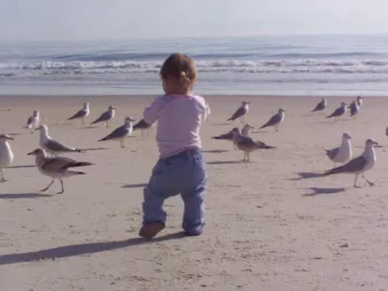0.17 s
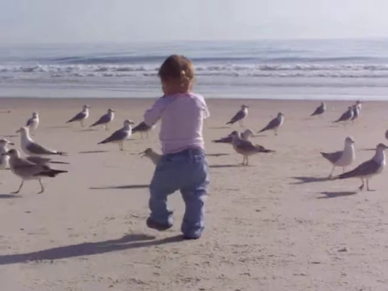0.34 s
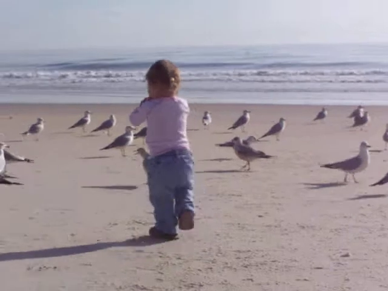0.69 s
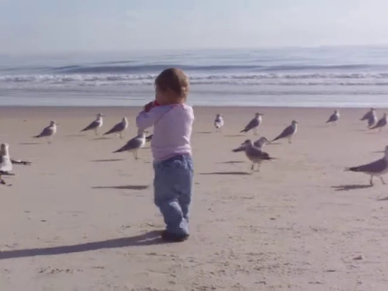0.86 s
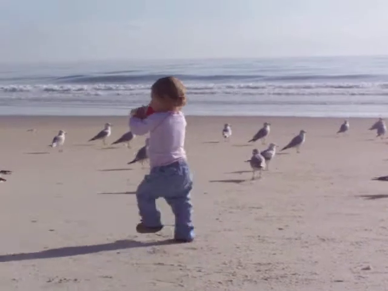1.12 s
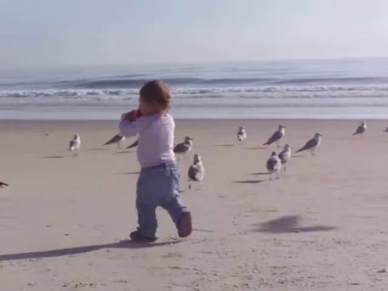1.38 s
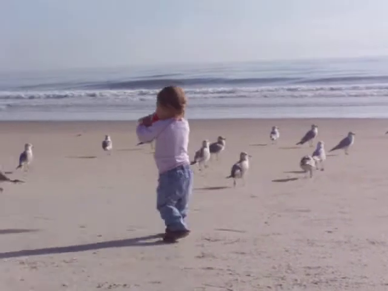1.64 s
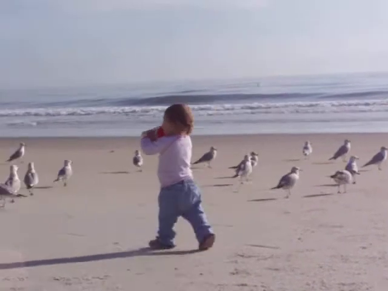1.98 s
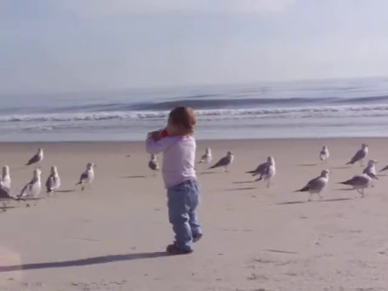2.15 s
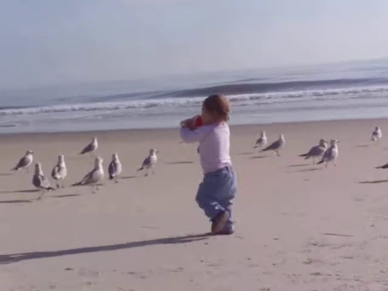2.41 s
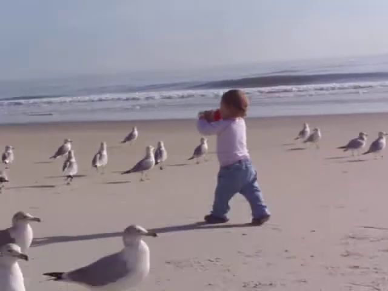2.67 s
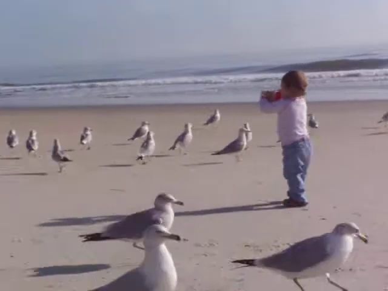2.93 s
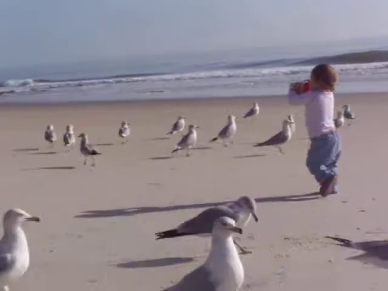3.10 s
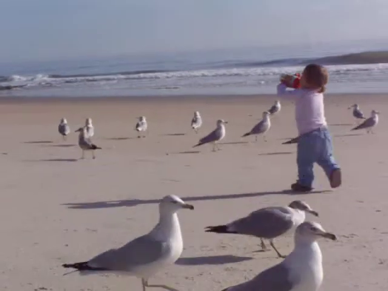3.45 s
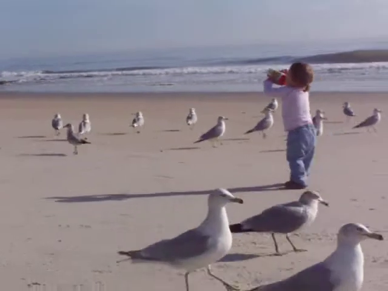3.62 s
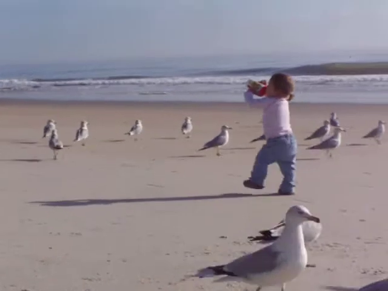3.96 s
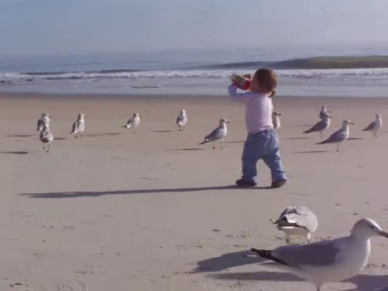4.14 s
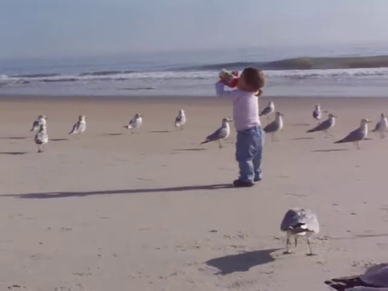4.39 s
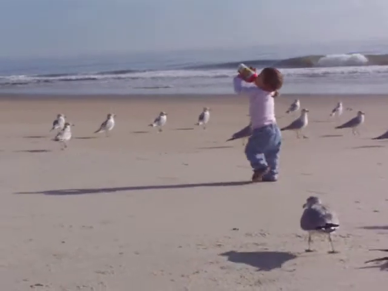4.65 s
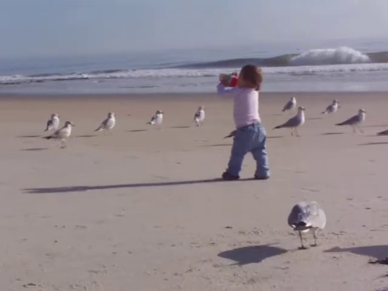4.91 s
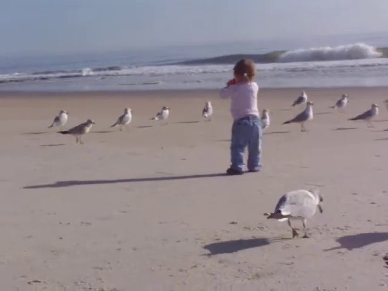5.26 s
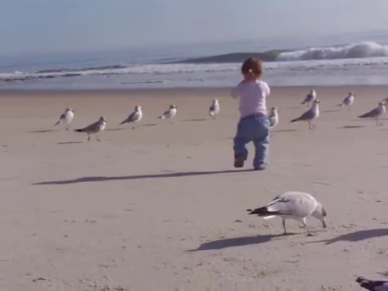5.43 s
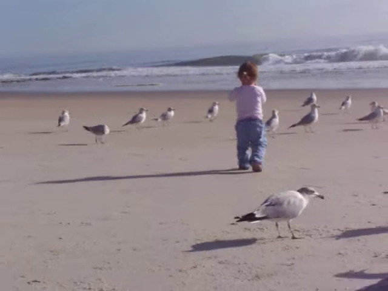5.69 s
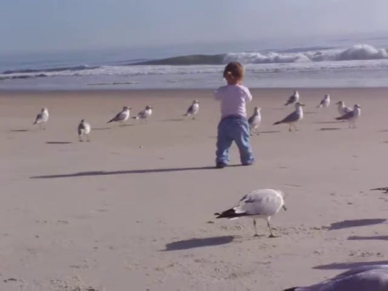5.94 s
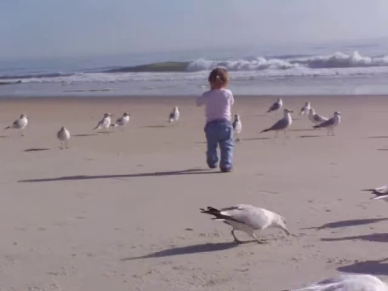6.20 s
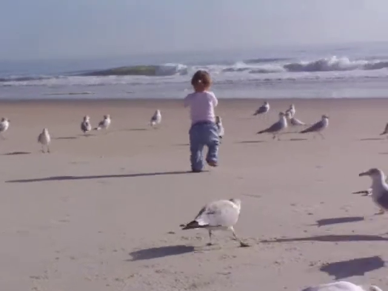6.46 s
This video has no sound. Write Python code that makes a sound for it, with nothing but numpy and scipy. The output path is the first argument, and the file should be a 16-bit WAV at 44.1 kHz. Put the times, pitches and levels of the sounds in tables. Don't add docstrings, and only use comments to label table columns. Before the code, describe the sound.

A large gull flock squeals, yelps and rasps in constant overlapping cries on an open beach, with low surf roaring and fizzing behind.

```python
import sys
import numpy as np
from scipy import signal
from scipy.fft import rfft, irfft, next_fast_len
from scipy.io import wavfile
from scipy.ndimage import uniform_filter1d

SR = 44100
rng = np.random.default_rng(int(sys.argv[2]) if len(sys.argv) > 2 else 0)


def waveform_to_disk(signal):
    frames = np.transpose(np.atleast_2d(signal))
    scaled = np.clip(frames, -1, 1) * 32767
    samples = np.round(scaled).astype(np.int16)
    wavfile.write(sys.argv[1], SR, samples)


def rack_gain(trim_db):
    fader = np.asarray(trim_db, float)
    return 10 ** (fader / 20)


N = 289737
T = np.arange(N) / SR
START_S, FOLD_HZ = 0.372, 8000
CLEAR_ROUGH, HOARSE_ROUGH = 0.1, 0.22
RASP_SPEED_UP, CROAK_SPEED_UP = 0.3, 0.091
HELD_ARCH = 0.026


def shape(x, points):
    hz, db = np.transpose(points)
    size = next_fast_len(len(x))
    f = np.maximum(np.arange(size // 2 + 1) * SR / size, 1)
    gain = rack_gain(np.interp(np.log(f), np.log(hz), db, -90, -90))
    return irfft(rfft(x, size) * gain, size)[:len(x)]


def unit(x):
    return x / np.sqrt(np.mean(x ** 2))


def walk(rate, size=N):
    hold = int(SR / rate)
    steps = np.repeat(rng.standard_normal(size // hold + 1), hold)
    return uniform_filter1d(uniform_filter1d(steps, hold), hold)[:size] * 4 / 3


def add(out, start_s, x):
    i = int(start_s * SR)
    out[i:i + len(x)] += x[:N - i]


# t/s, level/dB
SURF_ROAR = [(.38, -43.5), (.6, -36), (.75, -40.5), (.9, -32.5), (1.05, -38), (1.27, -35), (1.5, -41),
             (2.28, -26.5), (2.54, -37.5), (2.85, -47), (3.3, -45), (3.6, -32.5), (3.72, -49.5),
             (4.4, -45.5), (5.1, -38.5), (5.5, -29.5), (6.15, -43), (6.31, -36.5)]
# f/Hz, level/dB (per Hz)
ROAR_COLOUR = [(21, -44), (40, -7.5), (207, 1), (454, -2), (566, 0.5), (1500, -16.5), (1950, -54),
               (3300, -120)]
# f/Hz, level/dB (per Hz)
HISS_COLOUR = [(700, -15), (1500, -3), (3000, -2.5), (5000, 1.5), (6500, -4), (7500, -9), (8000, -11)]


def surf():
    roar_db = np.interp(T, *np.transpose(SURF_ROAR))
    roar = unit(shape(rng.standard_normal(N), ROAR_COLOUR)) * rack_gain(1.5 * walk(14))
    fizz = rng.standard_normal(N) * rack_gain(2 * walk(300) + 2 * walk(24))
    hiss = unit(shape(fizz, HISS_COLOUR))
    return rack_gain(roar_db) * roar + rack_gain(0.5 * roar_db - 18.0) * hiss


def whistle(rows, octave_db, edge_s=0.0025, waver=0.004, flutter_db=0.65, third_db=-12, flutter_rate=150):
    s, hz, db = np.transpose(rows)
    t = np.arange(s[0] - edge_s, s[-1] + edge_s, 1 / SR)
    hz = uniform_filter1d(np.interp(t, s, hz), size=500)
    hz = hz * (1 + waver * walk(120, size=len(t)))
    level_db = np.interp(t, s, db) + flutter_db * walk(flutter_rate, size=len(t))
    to_nearer_end = np.minimum(t - t[0], t[-1] - t)
    gain = rack_gain(level_db) * np.sqrt(2) * np.clip(to_nearer_end / (2 * edge_s), 0, 1)
    tone = np.sin(2 * np.pi * np.cumsum(hz) / SR)
    for order, over_db in ((2, octave_db), (3, octave_db + third_db)):
        folded = FOLD_HZ - np.abs(FOLD_HZ - order * hz)
        overtone = np.sin(2 * np.pi * np.cumsum(folded) / SR)
        tone = tone + rack_gain(over_db) * (order * hz < 8800) * overtone
    return gain * tone


def cry(s, length, first, last, db, rise_db=0, fall_db=0, bend=1, arch=0):
    u = np.linspace(0, 1, num=12)
    glide = first + (last - first) * u ** bend
    hz = glide * (1 - arch * (2 * u - 1) ** 6)
    return list(zip(s + length * u, hz, db - rise_db * (1 - u) - fall_db * u))


# f/Hz, level/dB
OCTAVE_BY_PITCH = [(1700, -49), (2850, -14), (3500, -20), (3900, -24), (4300, -40.5), (4900, -39.5)]


def pitch_octave(rows):
    return np.interp(np.mean(rows, axis=0)[1], *np.transpose(OCTAVE_BY_PITCH))


def sing(lines, octave_db=None, third_db=-12):
    out = np.zeros(N)
    for rows in lines:
        over_db = pitch_octave(rows) if octave_db is None else octave_db
        add(out, rows[0][0] - 0.003, whistle(rows, over_db, third_db=third_db))
    return out


# t/s, f/Hz, level/dB
REEDY_CALLS = [
    [(1.188, 3340, -40.5), (1.228, 3490, -36.5)],
    [(2.493, 4050, -34.5), (2.53, 4230, -38), (2.545, 4223, -43)],
    [(2.65, 4190, -34), (2.72, 4290, -40)],
    [(3.27, 3470, -42.5), (3.315, 3670, -31.5), (3.355, 3596, -40.5)],
    [(.374, 3230, -38), (.41, 3093, -31.5), (.5, 3185, -30), (.605, 3233, -31.5)],
    [(1.985, 2867, -23), (2.09, 2862, -20), (2.112, 2616, -31)],
    [(2.09, 3255, -24), (2.135, 3340, -20)],
    [(4.995, 2584, -24), (5.015, 3035, -27)],
    [(2.135, 4063, -22.5), (2.18, 4251, -24.5), (2.215, 3910, -25), (2.235, 3832, -22)],
]


def reedy_cries():
    return sing(REEDY_CALLS, octave_db=-6, third_db=-20)


def rasp(length_s, rate_hz, rough, db, throat_hz, speed_up, ring_s=0.00024):
    t = np.arange(0, length_s, 1 / SR)
    chance = rng.standard_normal((200, 2))
    cycle = np.cumsum(rate_hz * (1 + speed_up * t / max(length_s, 0.06))) / SR
    uneven_count = np.cumsum(1 + 0.2 * rough * chance[:, 0].clip(-2, 2)) - 2
    beats = np.interp(uneven_count, cycle, t, right=1)
    last = np.searchsorted(beats, t, side="right") - 1
    since = t - beats[last]
    hz = throat_hz * (0.9 + 3 * t.clip(0, 0.07))
    upper = np.sin(2 * np.pi * 1.108 * hz * since)
    lower = (1.1 - 0.5 * t / length_s) * np.sin(2 * np.pi * 0.7743 * hz * since)
    ring = (since / ring_s) ** 2 * np.exp(-since / ring_s)
    slaps = unit(ring * (upper + lower) * rack_gain(10 * rough * chance[last, 1]))
    throat = signal.butter(2, throat_hz * np.array([0.6, 1.4]), "band", fs=SR, output="sos")
    air = unit(signal.sosfilt(throat, rng.standard_normal(len(t))))
    swell = np.sin(np.pi * (t / length_s) ** 0.8) ** 0.8
    thin = signal.butter(3, 0.5 * throat_hz, "high", fs=SR, output="sos")
    return rack_gain(db) * swell * signal.sosfilt(thin, slaps + rough * air / 4)


def play_rasps(rows, rough, speed_up):
    out = np.zeros(N)
    for s, length, rate_hz, db, throat_hz in rows:
        add(out, s, rasp(length, rate_hz, rough, db, throat_hz, speed_up))
    return out


# t/s, length/s, pulse rate f/Hz, level/dB, throat f/Hz
EVEN_RASPS = [(.379, 0.0071, 333.9, -29, 5540), (1.96, .09, 108.7, -33.5, 2423), (4.41, .1, 423, -40, 3530),
              (2.96, .08, 347.9, -33, 4086), (.468, 0.024, 358.4, -25.5, 3560),
              (.896, 0.022, 322, -16.5, 4021), (1.25, .051, 331.7, -16, 4150),
              (1.68, 0.078, 402, -22, 3980), (2.65, .04, 258, -29.5, 5100),
              (3.301, 0.072, 312, -34.5, 2500), (3.798, 0.071, 313.5, -27.5, 4770),
              (4.262, 0.064, 358, -22, 4310), (4.501, 0.14, 402.7, -31, 3560),
              (4.711, 0.057, 305.3, -26, 3448), (4.996, 0.043, 821.3, -25, 4450),
              (6.299, 0.058, 314.4, -18.5, 4290), (6.349, 0.068, 523, -24, 4267)]


def clear_rasps():
    return play_rasps(EVEN_RASPS, CLEAR_ROUGH, RASP_SPEED_UP)


# t/s, length/s, pulse rate f/Hz, level/dB, throat f/Hz
BREATHY_RASPS = [(.42, .025, 407.1, -32.5, 4590), (2.04, 0.062, 378, -30.5, 6217),
                 (4.17, 0.034, 406, -36, 6615), (.6, 0.083, 357, -33, 5530),
                 (2.24, 0.099, 378.6, -25, 4450), (2.415, 0.02, 366, -25.5, 4059),
                 (2.825, 0.061, 330, -29, 3840), (4.765, 0.015, 393.3, -16.5, 4190),
                 (4.06, 0.036, 384.4, -27.5, 4340), (5.69, 0.023, 357.8, -33, 3040),
                 (2.044, 0.082, 384.1, -23, 3600), (2.436, .034, 395, -18, 4090),
                 (2.704, .04, 327, -22.5, 4510), (3.097, 0.11, 436, -26.5, 3800),
                 (3.61, .065, 330, -17.5, 4890), (3.63, .07, 410, -18, 4230),
                 (4.004, 0.018, 291, -25, 4614), (4.368, 0.028, 421, -16.5, 4880),
                 (4.595, .046, 387, -24, 4330), (4.93, 0.066, 459.8, -26, 5230),
                 (5.515, 0.042, 407, -20, 3680), (5.62, 0.056, 386.4, -21.5, 3900),
                 (6.106, 0.026, 409, -25.5, 3650)]


def hoarse_rasps():
    return play_rasps(BREATHY_RASPS, HOARSE_ROUGH, RASP_SPEED_UP)


# t/s, length/s, first f/Hz, last f/Hz, top level/dB
SWELLING_CALLS = [
    (0.481, .42, 3039, 2930, -25.5),
    (0.932, 0.054, 3325, 3393, -12),
    (1.668, 0.12, 3200, 3383, -18.5),
    (2.266, 0.068, 1659, 1800, -20),
    (2.568, 0.074, 4010, 4355, -20.5),
    (4.043, 0.028, 3310, 2900, -25),
    (4.884, 0.06, 3395, 3477, -17.5),
    (5.865, 0.16, 4670, 4690, -24),
    (5.94, 0.25, 4275, 4495, -25),
    (5.969, 0.14, 5000, 5076, -27),
]


def swelling_cries():
    return sing([cry(*c, rise_db=7, bend=1.7) for c in SWELLING_CALLS])


# t/s, length/s, first f/Hz, last f/Hz, level/dB
PLAIN_SQUEALS = [(0.514, 0.44, 7530, 7415, -52), (3.413, 0.16, 5604, 5364, -42),
                 (5.777, 0.15, 5623, 6030, -45.5), (2.429, 0.065, 4633, 5010, -24),
                 (2.511, 0.043, 4580, 4310, -19), (3.982, 0.018, 4394, 4080, -21),
                 (4.174, 0.087, 4690, 3921, -22.5), (4.637, .07, 3510, 3415, -27.5),
                 (5.158, 0.04, 3460, 3253, -18), (5.386, 0.036, 5370, 5440, -18.5),
                 (5.881, 0.087, 4214, 3700, -32)]


def plain_squeals():
    return sing([cry(*c) for c in PLAIN_SQUEALS], octave_db=-27.5)


# t/s, length/s, first f/Hz, last f/Hz, level/dB
SHORT_YELPS = [(0.516, 0.45, 1597, 1417, -50), (1.885, .016, 6750, 6100, -20),
               (2.317, 0.019, 5210, 5487, -13.5), (2.346, 0.078, 5250, 5645, -14.5),
               (2.441, .06, 1634, 1690, -31.5), (2.876, 0.064, 2382, 2080, -34),
               (4.518, 0.035, 6300, 6416, -29), (4.746, 0.024, 5670, 4000, -20),
               (5.025, 0.014, 4402, 4660, -18), (5.033, 0.017, 5600, 6842, -32.5),
               (5.178, .016, 4480, 4804, -22)]


def yelps():
    return sing([cry(*c) for c in SHORT_YELPS], octave_db=-27.5)


# t/s, length/s, first f/Hz, last f/Hz, level/dB
HELD_CALLS = [(0.517, .395, 4623, 4390, -26.5), (1.32, 0.215, 4363, 4430, -15),
              (1.782, 0.108, 4501, 4405, -16), (2.648, 0.4, 4557, 4496, -26.5),
              (3.292, .172, 4366, 4440, -30.5), (2.682, 0.064, 5001, 4955, -19),
              (3.891, 0.095, 5458, 5283, -21.5), (3.929, 0.11, 3290, 3326, -32),
              (4.868, 0.059, 5800, 5555, -19), (5.691, 0.059, 3615, 3660, -15),
              (6.379, 0.19, 3280, 3605, -30.5), (6.423, 0.15, 5034, 5130, -13.5)]


def held_cries():
    return sing([cry(*c, arch=HELD_ARCH) for c in HELD_CALLS])


# t/s, f/Hz, level/dB
CURVING_EARLY = [
    [(.683, 4713, -18.5), (.72, 4694, -28), (.77, 4780, -25.5), (.85, 5020, -23), (.912, 4840, -31.5)],
    [(.587, 3946, -16), (.65, 3764, -14.5), (.684, 3824, -17), (.69, 3618, -24.5), (.72, 3464, -32)],
    [(.745, 5834, -25), (.84, 5857, -25.5), (.86, 5840, -23.5), (.89, 5380, -38)],
    [(.985, 4220, -15), (1.12, 4306, -16), (1.14, 4016, -22)],
    [(1.055, 4910, -30), (1.12, 4880, -33), (1.14, 4596, -25.5)],
    [(1.5, 3130, -39.5), (1.53, 3306, -23), (1.56, 3010, -26.5)],
    [(1.543, 4660, -16.5), (1.58, 4732, -16), (1.65, 4367, -18), (1.72, 4420, -25), (1.8, 4237, -26.5),
     (1.85, 4130, -31)],
    [(2.465, 3454, -17), (2.51, 3078, -22), (2.55, 3033, -29)],
    [(2.478, 6660, -39.5), (2.51, 6218, -38), (2.55, 6170, -38.5), (2.61, 5110, -36)],
    [(2.535, 4330, -12.5), (2.6, 3510, -17), (2.63, 3307, -16.5), (2.65, 3420, -21.5)],
    [(2.722, 5600, -25.5), (2.736, 5780, -16.5), (2.756, 5340, -20), (2.825, 5328, -29)],
    [(2.755, 4960, -16), (2.79, 4604, -11.5), (2.817, 4560, -15), (2.825, 4760, -14)],
]
# t/s, f/Hz, level/dB
CURVING_LATER = [
    [(2.826, 5630, -25), (2.91, 5800, -16), (2.93, 6139, -15), (2.945, 5993, -21.5), (3.0, 6050, -41.5),
     (3.08, 6078, -33.5), (3.17, 5974, -32.5)],
    [(2.945, 5516, -14.5), (2.972, 5923, -20.5), (3.0, 5550, -17.5), (3.027, 6020, -27.5),
     (3.05, 5317, -16), (3.068, 5687, -33.5), (3.09, 6002, -22.5), (3.11, 5340, -15.5)],
    [(3.03, 4175, -33), (3.1, 4419, -20.5), (3.15, 4563, -19.5), (3.165, 4226, -30)],
    [(3.68, 4552, -16.5), (3.71, 4666, -19), (3.79, 4624, -20.5)],
    [(3.71, 3680, -34), (3.75, 3521, -32), (3.8, 3200, -31.5), (3.83, 3304, -28.5)],
    [(3.96, 6310, -30.5), (4.07, 6390, -32.5), (4.12, 6250, -26.5), (4.17, 5610, -29.5)],
    [(4.105, 5414, -40), (4.22, 5310, -40.5), (4.27, 4900, -32.5)],
    [(4.404, 5660, -19.5), (4.411, 4830, -14.5), (4.416, 5340, -21)],
    [(5.192, 5282, -15), (5.228, 5500, -12.5), (5.285, 5210, -13.5)],
    [(5.755, 3300, -25.5), (5.95, 3470, -36.5), (6.05, 3286, -46), (6.09, 3460, -20.5),
     (6.115, 3072, -23.5)],
    [(6.35, 4610, -9.5), (6.373, 5050, -19), (6.383, 4649, -25)],
    [(6.372, 3564, -18.5), (6.41, 3576, -15.5), (6.428, 3820, -17.5)],
]


def curving_cries():
    return sing(CURVING_EARLY + CURVING_LATER)


# t/s, length/s, first f/Hz, last f/Hz, level/dB
FAINT_SQUEALS = [(0.767, .1, 3524, 4000, -37), (0.981, 0.044, 2770, 2460, -35),
                 (1.23, 0.062, 4487, 4624, -29), (1.271, 0.023, 5810, 5690, -27.5),
                 (1.666, .09, 5400, 5450, -39.5), (1.888, 0.013, 3400, 3002, -28),
                 (2.127, 0.039, 4620, 4680, -23.5), (2.729, 0.02, 2865, 2734, -30.5),
                 (2.765, .03, 3790, 3468, -34), (3.116, 0.012, 1491, 1667, -35.5),
                 (3.27, .025, 1593, 1831, -32.5), (3.4, 0.2, 3800, 3735, -46.5),
                 (3.434, 0.15, 5010, 4760, -36.5), (3.456, 0.016, 2234, 2110, -40.5),
                 (3.48, 0.018, 1520, 1625, -37.5), (3.615, 0.028, 1495, 1867, -31),
                 (4.169, .06, 3186, 3236, -30), (4.645, 0.061, 5338, 5210, -30),
                 (4.644, .05, 4830, 4820, -32), (5.01, 0.016, 3370, 3711, -20.5),
                 (4.695, 0.026, 4150, 4150, -29.5), (4.432, 0.082, 5440, 5380, -31.5),
                 (3.298, 0.058, 2106, 2253, -41), (3.262, .1, 4925, 5105, -32),
                 (2.65, 0.05, 3203, 3200, -38), (5.206, 0.042, 3118, 3325, -34.5),
                 (5.21, 0.028, 4020, 3934, -36.5), (5.275, .045, 4710, 4610, -26.5),
                 (5.331, 0.025, 5400, 5250, -23), (5.453, 0.011, 6000, 5620, -28),
                 (5.462, 0.017, 3214, 2883, -31.5), (5.66, 0.016, 5935, 6090, -25),
                 (5.675, 0.12, 5440, 4930, -32.5), (5.877, 0.015, 5200, 5000, -28),
                 (6.184, 0.013, 3330, 2940, -30), (6.384, .035, 5380, 5400, -34)]


def faint_squeals():
    return sing([cry(*c) for c in FAINT_SQUEALS], octave_db=-27.5)


# t/s, length/s, pulse rate f/Hz, level/dB, throat f/Hz
REEDY_CROAKS = [
    (.909, 0.066, 669, -19.5, 3477),
    (5.527, 0.0463, 1142, -17.5, 3504),
]


def croaks():
    return play_rasps(REEDY_CROAKS, CLEAR_ROUGH, CROAK_SPEED_UP)


# t/s, length/s, first f/Hz, last f/Hz, level/dB
CRACKED_CALLS = [
    (1.023, 0.1, 3173, 3136, -34),
    (1.326, .17, 3120, 3193, -33),
    (1.798, 0.082, 3229, 3277, -38),
    (2.994, 0.11, 4580, 4618, -39),
    (3.331, 0.071, 4780, 4990, -35),
    (4.39, 0.15, 4760, 4790, -34),
    (4.529, 0.063, 2918, 3041, -39),
    (6.449, .12, 4598, 4610, -38.5),
]


def cracked_cries():
    out = np.zeros(N)
    for c in CRACKED_CALLS:
        add(out, c[0], whistle(cry(*c), -30, edge_s=0.008, waver=0.006, flutter_db=4, flutter_rate=500))
    return out


# t/s, length before the sag/s, first f/Hz, last f/Hz, top level/dB
DROOPING_CALLS = [
    (1.11, 0.18, 2619, 2894, -22.5),
    (1.585, 0.13, 2840, 2868, -23),
    (2.343, 0.12, 2620, 2924, -18.5),
    (2.949, 0.16, 2856, 3072, -26),
    (4.603, 0.13, 5650, 5814, -16),
]


def drooping_cries():
    out = np.zeros(N)
    sag_s, sag_share, sag_db = 0.035, 0.045, 15
    for s, length, first, last, db in DROOPING_CALLS:
        rows = cry(s, length, first, last, db, rise_db=7.5)
        rows = rows + [(s + length + sag_s, last * (1 - sag_share), db - sag_db)]
        out += sing([rows], octave_db=pitch_octave(rows) - 3)
    return out


# t/s, length/s, first f/Hz, last f/Hz, level/dB
SLIDING_CALLS = [
    (1.29, 0.042, 3125, 3264, -19),
    (4.087, 0.078, 3140, 3620, -31),
    (4.56, 0.042, 6488, 5787, -22.5),
    (4.625, .13, 7095, 6900, -33.5),
    (4.752, .075, 3263, 3423, -22),
    (4.938, .015, 3333, 3045, -14),
    (5.25, .086, 4621, 5015, -21),
    (5.656, .04, 3450, 3746, -16.5),
    (5.754, 0.11, 4370, 4670, -27.5),
]


def sliding_cries():
    return sing([cry(*c) for c in SLIDING_CALLS])


# t/s, length/s, first f/Hz, last f/Hz, level/dB
HUSKY_CALLS = [
    (1.533, 0.042, 3666, 3970, -20),
    (1.939, 0.049, 3712, 3950, -15.5),
    (3.168, .09, 3696, 3894, -31),
    (5.067, .12, 4500, 4430, -18.5),
    (5.342, .125, 4204, 4140, -28),
]


def husky_cries():
    out = np.zeros(N)
    for s, length, first, last, db in HUSKY_CALLS:
        main = cry(s, length, first, last, db, rise_db=3.5, arch=HELD_ARCH)
        under = cry(s, length, first / 2, last / 2, db - 16.5, arch=HELD_ARCH)
        out += sing([main], octave_db=-44.5 - db)
        out += sing([under], octave_db=-20, third_db=17)
    return out


# t/s, length/s, first f/Hz, last f/Hz, top level/dB
FADING_CALLS = [
    (2.872, 0.07, 3694, 3470, -21.5),
    (3.682, 0.13, 4090, 4707, -19),
    (3.768, 0.15, 4600, 4376, -21),
    (3.877, .046, 3230, 3361, -20),
    (4.418, 0.19, 5896, 5810, -13.5),
    (4.835, 0.041, 3440, 3260, -24.5),
    (4.836, 0.095, 4390, 4590, -25),
    (5.041, 0.13, 5414, 5183, -17.5),
]


def fading_cries():
    return sing([cry(*c, fall_db=9, bend=0.56) for c in FADING_CALLS])


def warble(rows, quick, first_db, last_db):
    line = []
    levels = np.linspace(first_db, last_db, len(rows) - 1)
    for (s, dip, crest), (next_s, *_), db in zip(rows, rows[1:], levels):
        line += [(s, dip, db)]
        line += [(s + 0.22 * (next_s - s), dip + quick * (crest - dip), db - 3.5)]
        line += [(next_s - 0.016, crest, db - 2.5)]
    return line + [(*rows[-1][:2], last_db - 7)]


# t/s, dip f/Hz, following crest f/Hz
WARBLE_DIPS = [
    [(3.112, 5510, 5513), (3.172, 5220, 5558), (3.235, 5124, 5650), (3.298, 5160, 5870),
     (3.362, 5250, 5610), (3.4, 5216, 5100)],
    [(3.706, 5910, 5840), (3.734, 5574, 5750), (3.796, 5530, 5830), (3.855, 5590, 5811),
     (3.912, 5490, 5910), (3.975, 5230, 5940), (4.038, 5047, 5190)],
]
# share of the climb made early, first level/dB, last level/dB
WARBLE_SHAPES = [(0.4, -20, -12), (0.992, -16.5, -15)]


def warbling_cries():
    return sing([warble(rows, *voice) for rows, voice in zip(WARBLE_DIPS, WARBLE_SHAPES)])


# t/s, f/Hz, level/dB
WANDERING_CALLS = [
    [(3.42, 6225, -38.5), (3.5, 6424, -23.5), (3.574, 6343, -15.5), (3.61, 6030, -14.5),
     (3.635, 5270, -38.5)],
    [(4.042, 4650, -11.5), (4.073, 4785, -18.5), (4.098, 4250, -20), (4.203, 4556, -18.5),
     (4.238, 4314, -19), (4.298, 4300, -16.5), (4.347, 4596, -17.5), (4.37, 4450, -15.5)],
    [(4.288, 2917, -39), (4.322, 3310, -24.5), (4.387, 3532, -23), (4.402, 3345, -35.5), (4.51, 3490, -30),
     (4.539, 2966, -24.5)],
    [(5.575, 3463, -11.5), (5.644, 3317, -16.5), (5.677, 3353, -24.5), (5.719, 3140, -22),
     (5.757, 3370, -25)],
    [(5.757, 4918, -15.5), (5.851, 4853, -14.5), (6.091, 4836, -17.5), (6.118, 4280, -23.5)],
]


def long_calls():
    under = [(s, hz / 2, db - 35.5) for s, hz, db in WANDERING_CALLS[-1]]
    return sing(WANDERING_CALLS) + sing([under], octave_db=-20, third_db=23)


def near_gulls():
    whistled = reedy_cries() + swelling_cries() + plain_squeals() + yelps() + held_cries()
    whistled += curving_cries() + faint_squeals() + cracked_cries() + drooping_cries() + sliding_cries()
    whistled += husky_cries() + fading_cries() + warbling_cries() + long_calls()
    return whistled + clear_rasps() + hoarse_rasps() + croaks()


def far_gulls(db, count=200):
    out = np.zeros(N)
    for k, (when, long, high, bend, loud) in enumerate(rng.random((count, 5))):
        s, length = when * N / SR * 0.98, 0.03 + 0.13 * long ** 2
        hz, level_db = 3000 + 2700 * high, db - 9 * loud
        if k % 9:
            arch = [(s, hz, level_db),
                    (s + length / 2, hz * 1.015, level_db),
                    (s + length, hz * (1.05 - 0.1 * bend), level_db - 4)]
            voice = whistle(arch, -24, edge_s=0.01, waver=0.004, flutter_db=2)
        else:
            voice = rasp(length, 300 + 350 * bend, 0.2, level_db - 3, hz * 0.8, speed_up=0.07)
        add(out, s, voice)
    return out


def wet_sand(gulls):
    smear = rng.standard_normal(2600) * np.exp(-np.arange(2600) / SR / 0.015)
    smear = smear / np.sqrt(np.sum(smear ** 2))
    return rack_gain(-13.5) * signal.fftconvolve(gulls, smear)[:N]


def ducking(gulls, hold_s=0.009, knee_db=-22, depth=0.55):
    power = uniform_filter1d(gulls ** 2, int(hold_s * SR), origin=int(hold_s * SR / 4))
    return (1 + power / rack_gain(2 * knee_db)) ** (-depth / 2) * rack_gain(2.5)


def scene():
    gulls = near_gulls()
    stir = uniform_filter1d(gulls ** 2, size=6000) ** 0.067
    far = stir * far_gulls(db=-35)
    opening = rack_gain(np.interp(T, (0.37, 0.6), (-8, 0)))
    background = opening * (ducking(gulls) * surf() + far)
    return (gulls + wet_sand(gulls) + background)[None]


def low_pass(x):
    return signal.sosfilt(signal.butter(12, 9060, fs=SR, output="sos"), x)


def record(dry):
    x = shape(np.tanh(1.7 * dry[0]) / 1.7, [(10, 0), (7000, 0), (8000, -6)])
    flipped = 2 * x * np.cos(4 * np.pi * FOLD_HZ * T)
    mirror = shape(flipped, [(7900, -33.5), (8000, 3.0), (8500, -15.5), (9000, -34.0)])
    mix = ((x + mirror) * (T > START_S))[None]
    return low_pass(mix)


dry = scene()
out = record(dry)
waveform_to_disk(out)
```